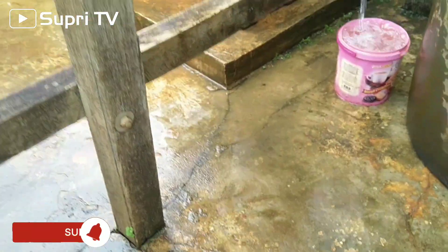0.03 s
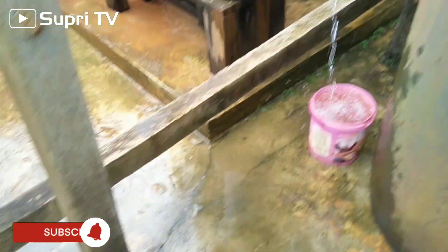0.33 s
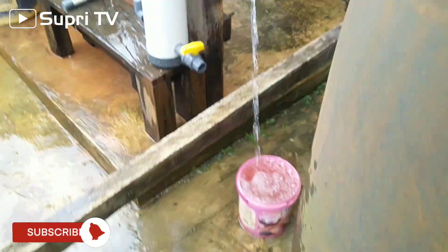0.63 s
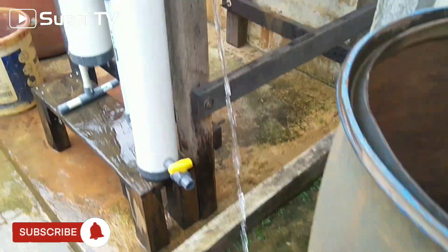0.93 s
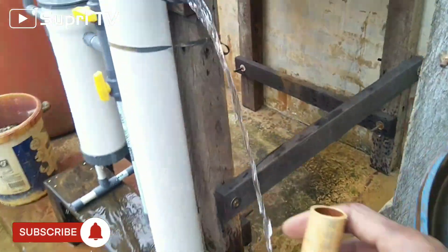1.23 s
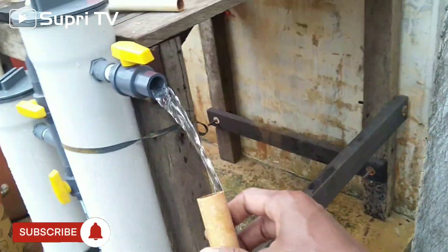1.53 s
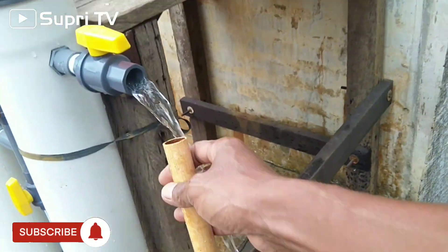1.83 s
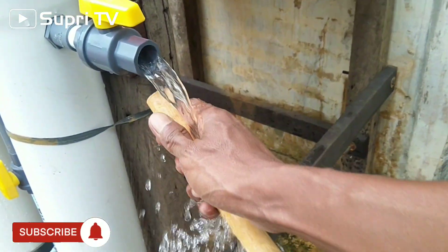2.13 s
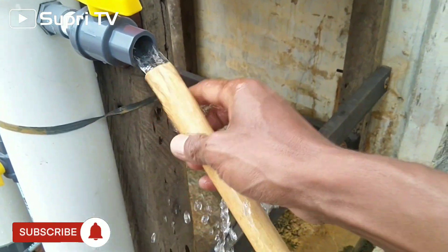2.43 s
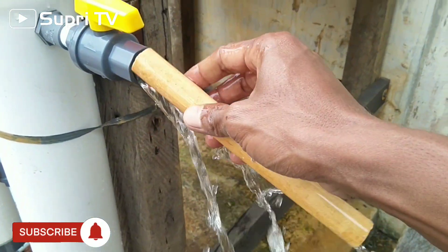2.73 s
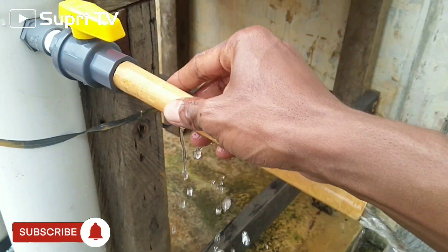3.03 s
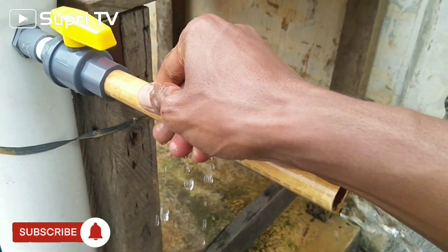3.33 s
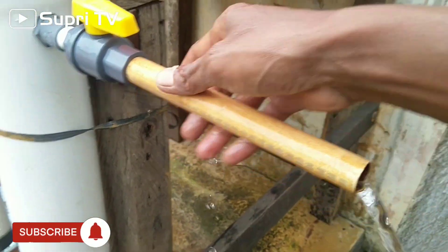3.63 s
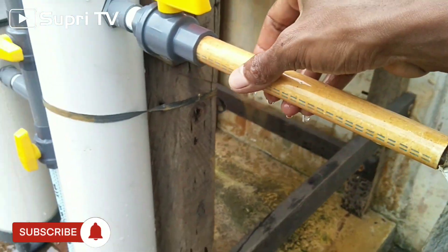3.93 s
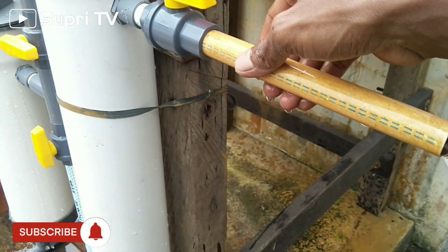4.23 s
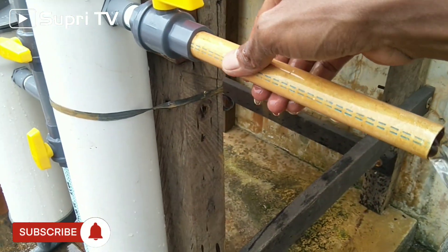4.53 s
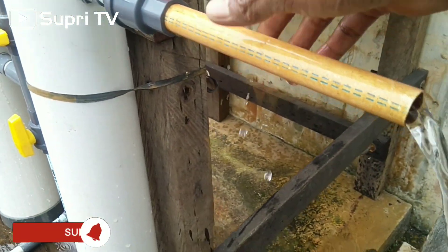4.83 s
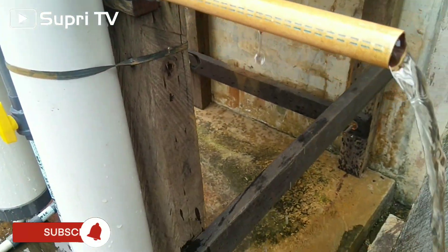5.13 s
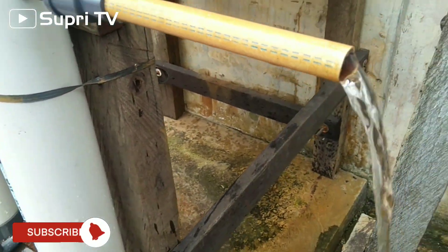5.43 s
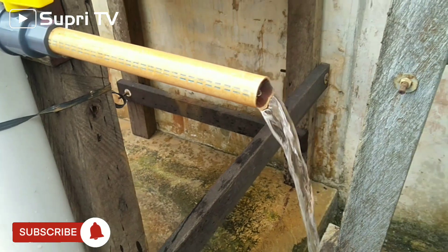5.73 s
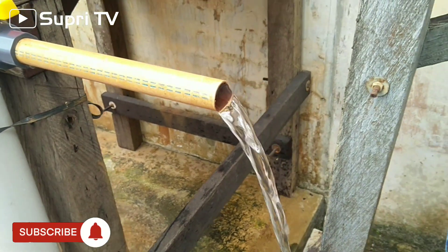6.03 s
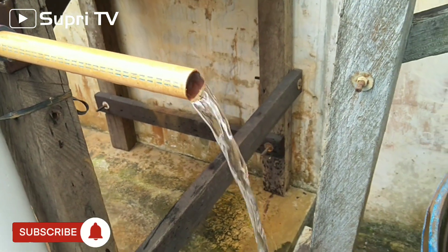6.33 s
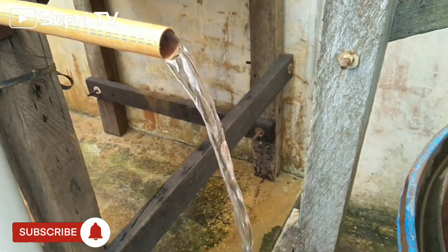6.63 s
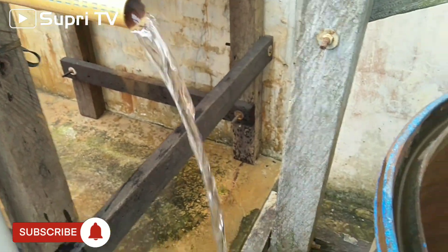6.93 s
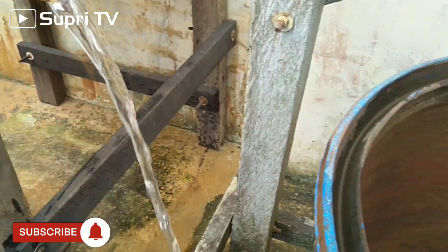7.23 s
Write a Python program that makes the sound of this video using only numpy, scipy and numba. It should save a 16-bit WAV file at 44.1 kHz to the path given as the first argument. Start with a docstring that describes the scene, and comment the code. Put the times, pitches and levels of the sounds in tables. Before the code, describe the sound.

In a walled corner outdoors, a nearby stream of water splashes and gurgles into a full bucket while air briefly buffets the microphone. The stream gives way to short hissing squirts, scattered spatter and ringing drips as a bamboo tube is fitted to the outlet. Water churns faintly inside the tube, then pours out and splashes unevenly onto wet concrete. A low rumble and short echoes continue throughout.

```python
"""First, water runs from an open valve into a small full bucket in a walled corner of a yard.
It lands in lumps that slap, and the air they trap rings as plops and glugs.
At about 2.3 s a bamboo tube is pushed into the valve: water hisses through the gap,
the jet breaks up and drips smack on the wet concrete. From about 5.7 s the stream leaves
the tube and splashes on the ground. A low rumble and short echoes last throughout."""
import sys
import numpy as np
from scipy import signal
from scipy.fft import rfft, irfft
from scipy.io import wavfile
from scipy.ndimage import uniform_filter1d
from numba import njit

SR = 44100
rng = np.random.default_rng(int(sys.argv[2]) if len(sys.argv) > 2 else 0)


def store_wav(level_fs):
    """Save 16-bit WAV to argv[1]."""
    pcm = np.round(np.clip(np.atleast_2d(level_fs), -1, 1) * 32767)
    wavfile.write(sys.argv[1], SR, pcm.T.astype(np.int16))


N = 325458
TIME = np.arange(N) / SR

# The low rumble of the surroundings. Each row: time in seconds, level in dB.
RUMBLE_LEVELS = [(0.0, -45), (0.4, -36.5), (1.1, -43.5), (2.2, -36.5), (2.6, -43.5), (3.9, -38),
                 (5.15, -39), (5.6, -41.5), (6.6, -41.5), (6.9, -49.5), (7.38, -50)]
# Water churning in valve and tube, louder once the tube runs full. Each row: time in seconds, level in dB.
CHURN_LEVELS = [(2.2, -51), (3.0, -50), (3.8, -46), (5.2, -42), (5.8, -45.5)]
# The stream into the bucket, and later onto the ground. Each row: time in seconds, level in dB.
BUCKET_FLOW = [(0.0, -27), (0.3, -30), (1.1, -29), (1.7, -28), (2.16, -30), (2.245, -28.5), (2.3, -36),
               (2.45, -55)]
GROUND_FLOW = [(5.62, -66), (5.75, -32.5), (6.6, -34.5), (7.38, -33)]

# The tone colour of each source, from bass to treble. Each row: frequency in Hz, level in dB.
RUMBLE_COLOUR = [(20, -27), (35, -11), (47, -1.5), (60, -2), (76, -0.5), (97, 1.5), (115, -14), (135, 0),
                 (200, -12.5), (400, -28.5)]
CHURN_COLOUR = [(110, -5), (160, -1.5), (220, -6), (330, 0.5), (500, -2), (750, -5.5), (1200, -18),
                (3000, -26)]
SPRAY_COLOUR = [(1500, -25.5), (3000, -21), (4500, -3), (5500, 2.5), (6500, 5.5), (7400, 3.5), (8200, -0.5)]
PATTER_COLOUR = [(600, -5), (1200, -8), (2000, -5.5), (2900, -1.5), (4200, -2.5), (5500, -6), (8000, -28)]
BUCKET_COLOUR = [(120, -23.5), (200, -3), (333, -2), (589, -8), (778, -4), (1200, -9.5), (2800, -9.5),
                 (5440, -15), (7070, -13), (8000, -21.5), (10400, -42), (17600, -120)]
GROUND_COLOUR = [(76, -32.5), (150, -3.5), (278, -3.5), (399, -8), (507, -6), (1060, -3), (1360, -10),
                 (1880, -9.5), (4010, -9), (5200, -14), (7090, -8.5), (8000, -17), (10400, -66),
                 (17600, -120)]
# The notes at which the corner's hollows and the bucket ring.
# Each row: pitch in Hz, width in Hz, level in dB.
HOLLOW_RINGS = [(275, 30, -6), (526, 26, -9.5), (1085, 35, -7.5), (1810, 130, -9.5)]
BUCKET_RINGS = [(1540, 290, -8.5), (2750, 110, -11)]

# A hum swelling out of the rumble. Each row: start in seconds, length in seconds, level in dB.
HUM_SWELLS = [(4.3, 0.5, -40), (4.96, 0.24, -40)]
# Air buffeting the swinging microphone. One row: start in seconds, length in seconds, level in dB.
AIR_BUFFET = (0.665, 0.084, -35.5)
# Soft bumps on the microphone. Each row: start in seconds, level in dB, pitch in Hz.
BUMPS = [(0.675, -21, 101), (0.712, -14.5, 122), (0.726, -18.5, 230)]
# Water squeezed through a narrow gap.
# Each row: start and end in seconds, first and last pitch in Hz, level in dB.
SQUIRTS = [(2.27, 2.44, 3950, 4100, -49), (2.96, 3.03, 3100, 3400, -43), (3.025, 3.075, 3600, 4200, -42),
           (3.055, 3.18, 4450, 4700, -38.5), (3.50, 3.63, 4600, 5200, -53)]
# Stray water landing on the concrete.
# Each row: start and length in seconds, level of fine spray in dB, level of coarse patter in dB.
SHOWERS = [(2.46, 0.1, -39.5, -40), (2.621, 0.11, -47, -44), (2.727, 0.18, -42, -45),
           (2.924, 0.3, -40.5, -44), (3.169, 0.15, -39, -39), (3.351, 0.11, -41, -44.5),
           (3.713, 0.15, -51.5, -59), (4.118, 0.12, -41, -44), (4.374, 0.077, -38.5, -44),
           (4.273, 0.95, -51.5, -65), (4.632, 0.13, -41, -45.5), (4.907, 0.11, -42.5, -52),
           (4.992, 0.25, -36.5, -40.5), (5.074, 0.07, -50, -39), (5.27, 0.48, -41.5, -48)]
# Trapped air bubbles; the big, low ones glug. Each row: start in seconds, level in dB, pitch in Hz.
BUBBLES = [(1.247, -27, 297), (1.334, -29, 276), (1.492, -26.5, 327), (1.505, -26, 466), (1.545, -28, 562),
           (1.618, -26, 272), (1.655, -34, 430), (1.834, -27, 320), (1.982, -28, 329), (2.049, -26, 285),
           (2.157, -21.5, 314), (2.688, -29, 3400), (3.553, -33.5, 3020), (3.683, -31, 3120),
           (5.995, -27, 3900), (6.04, -24, 2500), (6.142, -26.5, 1970), (6.232, -24, 4000),
           (6.272, -29, 3570), (7.076, -30, 262)]
# Air pockets closing with a round plop. Each row: start in seconds, level in dB, pitch in Hz.
PLOPS = [(0.088, -21, 1170), (0.274, -16, 1550), (0.423, -21, 1420), (0.54, -20, 1420), (0.597, -19, 1360),
         (1.067, -20.5, 760), (1.246, -17.5, 1670), (1.416, -19, 1330), (1.769, -15.5, 1380),
         (1.8035, -13, 1270), (1.839, -22, 980), (1.871, -28, 1190), (1.894, -19, 1600),
         (1.908, -19.5, 1770), (1.9574, -12.5, 1390), (1.968, -24, 1650), (1.994, -38, 910),
         (2.05, -25, 880), (2.0825, -19.5, 1530), (2.112, -25, 1480), (2.139, -28, 910), (2.185, -20, 1520),
         (2.213, -21, 1570), (2.234, -27, 1480), (2.322, -25, 924), (2.52, -25.5, 1500), (2.549, -27, 1650),
         (2.664, -26, 1380), (3.122, -28.5, 1240), (3.166, -8, 1790), (3.196, -16, 1470),
         (3.29, -25.5, 840), (3.3156, -19.5, 1520), (3.494, -26.5, 1760), (3.6452, -28, 1350),
         (3.672, -32, 1300), (5.7563, -14.5, 2010), (5.768, -21, 500), (5.803, -20, 1980),
         (5.821, -20, 947), (5.837, -17, 1950), (6.037, -24.5, 1880), (6.071, -17, 910), (6.129, -28, 1070),
         (6.456, -11.5, 998), (6.547, -21, 1050), (6.65, -26, 1260), (6.681, -23, 1870), (6.82, -24.5, 970),
         (6.833, -21, 1860), (6.936, -23, 1510), (7.157, -24, 980), (7.18, -23, 2050), (7.222, -24.5, 690),
         (7.296, -21.5, 1030)]
# Small lumps of water hitting flat. Each row: start in seconds, level in dB, middle frequency in Hz.
SPATS = [(0.112, -17, 4000), (0.3636, -22.5, 2850), (0.672, -20.5, 3280), (0.724, -19, 2200),
         (0.926, -25.5, 2300), (0.856, -20.5, 3150), (1.247, -24.5, 1900), (1.269, -33, 2600),
         (1.291, -24, 2770), (1.605, -19, 2400), (1.834, -21, 3360), (1.905, -34, 2600),
         (2.046, -22.5, 3100), (5.787, -19, 3150), (5.981, -23.5, 3470), (6.114, -22, 2940),
         (6.18, -25, 2930), (6.25, -22, 2100), (6.507, -22.5, 3500), (6.568, -22.5, 3800),
         (6.7087, -23.5, 2960), (6.8548, -23.5, 2700), (6.916, -24, 3700), (6.983, -18, 3300),
         (7.046, -24, 3010), (7.06, -21, 3720), (7.1237, -26, 2690), (7.1579, -21, 4450),
         (7.281, -23.5, 4110), (7.3144, -19, 3820)]
# Single drops on hard, wet surfaces. Each row: start in seconds, level in dB, pitch in Hz.
HARD_DROPS = [(0.144, -30, 7100), (0.2165, -27.5, 7300), (1.1865, -18, 4600), (1.2148, -29, 7100),
              (2.611, -20.5, 6300), (2.661, -20.5, 3560), (2.73, -22.5, 6050), (2.771, -24.5, 2530),
              (2.7948, -25, 6050), (2.829, -16.5, 6900), (2.957, -21, 3680), (2.9836, -16, 4000),
              (2.9865, -16, 3170), (3.095, -22.5, 4300), (3.1817, -15, 6440), (3.251, -19.5, 4770),
              (3.36, -25, 3700), (3.468, -30.5, 6940), (3.719, -21.5, 5040), (3.845, -25.5, 5040),
              (4.126, -24.5, 6670), (4.143, -23, 6500), (4.169, -23, 6400), (4.245, -31, 7000),
              (4.338, -24.5, 6560), (4.44, -28, 4700), (4.676, -30, 5000), (4.769, -27, 5940),
              (4.884, -30.5, 6670), (5.003, -22.5, 4470), (5.016, -22.5, 1840), (5.225, -24, 3900),
              (5.474, -21, 3140), (5.558, -28.5, 6600), (5.68, -24, 4170), (6.473, -17.5, 3200)]
# Heavy drips into standing water. Each row: start in seconds, level in dB, cavity pitch in Hz,
# ring length in cycles, pitch of a second bubble in Hz, its level in dB compared with the first.
PUDDLE_DRIPS = [(0.455, -18.5, 2725, 60, 2100, -16), (1.1857, -15, 2870, 47, 3160, -9),
                (3.026, -8.5, 3270, 27, 3880, -2.5), (3.2072, -10, 2950, 27, 4050, -2),
                (3.9405, -9.5, 3270, 18, 2336, -1.5), (4.2088, -9.5, 2820, 17, 2470, -2.5),
                (5.084, -18.5, 2670, 64, 2520, -4)]
# Large lumps of water slapping down.
# Each row: start in seconds, level in dB, cavity pitch in Hz, extra treble in dB.
SLAPS = [(0.027, -19.5, 853, 4), (0.1155, -2, 1550, -29), (0.168, -7, 575, -23), (0.172, -5, 1570, -29),
         (0.32, -14.5, 1250, -12), (0.656, -16, 1290, -8), (0.805, -20, 2020, -7.5), (1.483, -13, 880, -24),
         (1.497, -20, 654, -23), (1.513, -16, 790, -23), (1.529, -23, 556, -17), (1.6834, -15.5, 810, -2.5),
         (1.699, -23.5, 900, 1), (1.763, -20, 795, -0.5), (1.853, -17.5, 900, -5), (2.125, -16.5, 1520, -6),
         (3.163, -17, 1310, 2), (3.195, -20, 1640, -7), (3.208, -14, 1410, 4.5), (5.742, -23.5, 654, -11),
         (5.7569, -12.5, 910, -7), (6.071, -25.5, 950, 0), (6.457, -20.5, 1030, -8),
         (6.74, -21.5, 1070, -4)]


def undb(db):
    """Turn decibels into a gain to multiply by."""
    return 10 ** (np.asarray(db) / 20)


def curve(rows):
    """A gain that follows rows of seconds and dB, and fades quickly outside them."""
    times, db = np.transpose(rows)
    outside_s = np.abs(TIME - np.clip(TIME, times[0], times[-1]))
    return undb(np.interp(TIME, times, db) - 300 * outside_s)


def swells(rows, attack_s, release_s):
    """A gain that rises, holds and dies away for each row; where rows overlap, their powers add."""
    power = np.zeros(N)
    for start_s, length_s, db in rows:
        age = TIME[TIME > start_s] - start_s
        rise = np.minimum(age / attack_s, 1)
        fall = np.exp(-np.maximum(age - length_s, 0) / release_s)
        power[N - len(age):] += (undb(db) * rise * fall) ** 2
    return np.sqrt(power)


def surges(rate, db):
    """A gain for uneven gushes: it slides to a new random level `rate` times a second."""
    levels = np.clip(rng.standard_normal(int(rate * N / SR) + 2), -2, 1.5)
    return undb(db * np.interp(TIME * rate, np.arange(len(levels)), levels))


def steady(x):
    """Hold the average power at 1, keeping the quick flickers."""
    return x / np.sqrt(np.abs(uniform_filter1d(x ** 2, size=6000)) + 1e-18)


def colour(x, points):
    """Shape bass and treble along rows of Hz and dB."""
    hz, db = np.transpose(points)
    grid_hz = np.maximum(np.fft.rfftfreq(8192, 1 / SR), 1)
    bass_cut_db = 24 * np.minimum(np.log2(grid_hz / hz[0]), 0)
    gains = undb(np.interp(np.log(grid_hz), np.log(hz), db) + bass_cut_db)
    # folding the cepstrum keeps the filter from ringing before a hit
    cepstrum = irfft(np.log(gains))
    half = len(cepstrum) // 2
    cepstrum[1:half] *= 2
    cepstrum[half + 1:] = 0
    return signal.fftconvolve(x, irfft(np.exp(rfft(cepstrum))))[:len(x)]


def band(x, lo_hz, hi_hz):
    """Gently turn down everything outside two frequencies."""
    edges_hz = [lo_hz, min(hi_hz, SR / 2 - 1)]
    return signal.sosfilt(signal.butter(2, edges_hz, "band", fs=SR, output="sos"), x)


@njit
def grains(times, pitches, cycles, sizes, glide):
    """Short notes that fade 50 dB over their cycles; a glide of 0.1 lifts the pitch by a tenth."""
    out = np.zeros(N)
    for k in range(len(times)):
        start = int(times[k] * SR)
        length = int(cycles[k] * SR / pitches[k]) + 2
        phase = 0.
        for i in range(max(0, min(length, N - start))):
            phase += 2 * np.pi * pitches[k] * (1 + glide * i / length) / SR
            out[start + i] += sizes[k] * np.exp(-5.76 * i / length) * np.sin(phase)
    return out


def bursts(times, db, decay_s, lo_hz, hi_hz):
    """Sharp puffs of noise, each at its own level."""
    t = TIME[:SR // 10]
    out = np.zeros(N + len(t))
    for start_s, gain in zip(times, undb(db)):
        puff = band(rng.standard_normal(len(t)) * np.exp(-t / decay_s), lo_hz, hi_hz)
        out[int(start_s * SR):][:len(t)] += gain * puff * np.sqrt(decay_s * SR / 2 / np.sum(puff ** 2))
    return out[:N]


def resonate(x, rings):
    """The soft ringing that a sound stirs up in a hollow space."""
    return sum(undb(db) * signal.lfilter(*signal.iirpeak(hz, hz / width, fs=SR), x)
               for hz, width, db in rings)


def yard(x, first_echo_s=0.0014, fade_s=0.21, shifts=16):
    """Grainy echoes from the close wall, tanks and floor; they shift as the microphone moves."""
    t, out = TIME[:SR // 3], np.zeros(N + SR)
    for k in range(shifts + 1):
        # each overlapping piece gets its own echo pattern
        piece = x * np.cos(np.pi / 2 * np.clip(np.arange(N) * shifts / N - k, -1, 1))
        start, end = max((k - 1) * N // shifts, 0), (k + 1) * N // shifts
        echoes = rng.standard_normal(len(t)) ** 3 * undb(-60 * t / fade_s) * (t > first_echo_s)
        echoed = signal.fftconvolve(piece[start:end], echoes / np.sqrt(np.sum(echoes ** 2)))
        out[start:start + len(echoed)] += echoed
    return out[:N]


def rumble():
    """The surroundings give a wavering rumble, which swells once as air buffets the microphone."""
    wavering = curve(RUMBLE_LEVELS) * surges(rate=9.5, db=-1.1)
    buffet = swells([AIR_BUFFET], attack_s=0.083, release_s=0.14)
    return steady(colour(rng.standard_normal(N), RUMBLE_COLOUR)) * (wavering + buffet)


def hum(hz=76.3):
    """A low, pure drone that comes and goes."""
    tone = np.sqrt(2) * np.sin(2 * np.pi * hz * TIME)
    return tone * swells(HUM_SWELLS, attack_s=0.05, release_s=0.034)


def bumps(cycles=9.):
    """Soft knocks on the microphone make low thuds that sag a little in pitch."""
    times, db, hz = np.transpose(BUMPS)
    thuds = grains(times, hz, np.full(len(times), cycles), undb(db), glide=-0.023)
    return band(thuds, 95, 600)


def churn():
    """Water tumbles through valve and tube with a low, uneven rush."""
    rush = steady(colour(rng.standard_normal(N), CHURN_COLOUR))
    return rush * curve(CHURN_LEVELS) * surges(rate=20, db=2.0)


def slosh(gain_db=-25, hold_s=0.012):
    """The puddle churns on briefly after each large slap."""
    rows = [(start_s, hold_s, db + gain_db) for start_s, db, _, _ in SLAPS]
    rush = steady(colour(rng.standard_normal(N), CHURN_COLOUR))
    return rush * swells(rows, attack_s=0.0017, release_s=0.075)


def squirts(half_width_hz=340):
    """A sputtering hiss rises in pitch as the gap between tube and valve closes."""
    out = np.zeros(N)
    for start_s, end_s, start_hz, end_hz, db in SQUIRTS:
        progress = np.clip((TIME - start_s) / (end_s - start_s), 0, 1)
        phase = 2 * np.pi * np.cumsum(start_hz + (end_hz - start_hz) * progress) / SR
        # low noise times a tone gives a hiss around that tone
        hiss = steady(band(rng.standard_normal(N), 22, half_width_hz) * np.sin(phase))
        out += hiss * np.sqrt(np.abs(np.sin(np.pi * progress))) * undb(db)
    return out * surges(rate=48, db=2.5)


def fizz(rate=110, cycles=130.):
    """Tiny bubbles ring in the wet film, each a short rising note."""
    when, note, size = rng.random((int(rate * N / SR), 3)).T
    hz = 3500 + 4300 * note
    return steady(grains(when * N / SR, hz, np.full(len(when), cycles), undb(12 * size), glide=.06))


def droplets(points, rate, scatter_db, mist_db):
    """Small drops tick on the concrete in a hiss of mist, a few much larger than the rest."""
    when, note, ring, size = rng.random((int(rate * N / SR), 4)).T
    hz = 900 + 7300 * note
    cycles = 5 * 10 ** ring
    gains = undb(-scatter_db * np.log(np.maximum(size, .02))) * np.sqrt(hz / cycles)
    ticks = steady(colour(grains(when * N / SR, hz, cycles, gains, glide=.05), points))
    mist = steady(colour(rng.standard_normal(N), points))
    return steady(ticks + undb(mist_db) * mist)


def spray(fizz_db=-7, leak_db=-57.5):
    """The broken jet comes down in showers of fine, fizzing spray and coarser patter."""
    fine = droplets(SPRAY_COLOUR, rate=1100, scatter_db=4.0, mist_db=-2) + undb(fizz_db) * fizz()
    coarse = droplets(PATTER_COLOUR, rate=760, scatter_db=6.0, mist_db=0.5)
    times, lengths, fine_db, coarse_db = np.transpose(SHOWERS)
    fine_gain, coarse_gain = (swells(zip(times, lengths, db), attack_s=0.0063, release_s=0.022)
                              for db in (fine_db, coarse_db))
    leak = curve([(2.46, leak_db), (5.8, leak_db)])  # the loose joint dribbles between showers
    return (fine * fine_gain + coarse * np.hypot(coarse_gain, leak)) * surges(rate=70, db=2.5)


def bubbles(gain_db=2, cycles_at_1khz=38):
    """Trapped air rings and rises in pitch as it nears the surface; small bubbles last more cycles."""
    times, db, hz = np.transpose(BUBBLES)
    cycles = cycles_at_1khz * np.cbrt(hz / 1000)
    return grains(times, hz, cycles, undb(db + gain_db), glide=0.15)


def plops(gain_db=4, froth_db=-12, cycles_at_1khz=17.7, rise_share=0.29, glide=0.088):
    """An air pocket swells into a short note as it closes, with a little froth around it."""
    times, db, hz = np.transpose(PLOPS)
    cycles = cycles_at_1khz * np.sqrt(hz / 1000)
    gains = undb(db + gain_db)
    note = grains(times, hz, cycles, gains, glide)
    onset = grains(times, hz, cycles * rise_share, gains, glide * rise_share)
    froth = bursts(times, db + froth_db, decay_s=0.0056, lo_hz=710, hi_hz=2620)
    return note - onset + froth  # taking away a shorter note softens the start


def spats(rise_s=0.0015, decay_s=0.0046):
    """A small lump flattens on the wet film in a soft puff of noise, one octave wide."""
    t, out = TIME[:SR // 10], np.zeros(N + SR)
    shape = (1 - np.exp(-t / rise_s)) * np.exp(-t / decay_s)
    for start_s, db, hz in SPATS:
        noise = band(rng.standard_normal(len(t)), hz / np.sqrt(2), hz * np.sqrt(2))
        out[int(start_s * SR):][:len(t)] += undb(db) * shape * noise / np.std(noise)
    return out[:N]


def hard_drops(snap_db=6, crack_db=-4, smack_db=-11, scatter_db=-7):
    """A drop snaps and cracks on the wet film, smacks flat, rings briefly and scatters droplets."""
    times, db, hz = np.transpose(HARD_DROPS)
    treble_db = 11 * np.log2(hz / 4650)  # smaller, higher drops scatter more treble
    snap = grains(times, hz, np.full(len(times), 3.), undb(db + snap_db), glide=0.)
    crack = bursts(times, db + crack_db, decay_s=.0012, lo_hz=2800, hi_hz=8000)
    smack_levels = db + smack_db - np.maximum(treble_db, 0)
    smack = bursts(times, smack_levels, decay_s=0.0047, lo_hz=1810, hi_hz=4280)
    ring = grains(times, hz, np.full(len(times), 22.), undb(db), glide=.1)
    scatter = bursts(times, db + treble_db + scatter_db, decay_s=.005, lo_hz=4500, hi_hz=8000)
    return band(snap + crack + smack + ring + scatter, 1300, 12000)  # so small a drop makes no bass


def puddle_drips(tick_db=-7, splash_db=-16.5, linger_db=-23, linger_cycles=380.):
    """A heavy drip ticks, rings its cavity and a second bubble, and splashes; both notes linger."""
    times, db, hz, cycles, second_hz, second_db = np.transpose(PUDDLE_DRIPS)
    ring = grains(times, hz, cycles, undb(db), glide=.04)
    second = grains(times, second_hz, cycles, undb(db + second_db), glide=.06)
    long_cycles = np.full(len(times), linger_cycles)
    linger = sum(grains(times, pitch, long_cycles, undb(level + linger_db), glide=.02)
                 for pitch, level in ((hz, db), (second_hz, db + second_db)))
    tick = bursts(times, db + tick_db, decay_s=0.0021, lo_hz=1660, hi_hz=7700)
    splash = bursts(times, db + splash_db, decay_s=0.016, lo_hz=2600, hi_hz=3900)
    return band(ring + second + linger + tick + splash, 1300, 12000)


def slaps(thud_db=-6.5, pocket_db=-11, splash_db=-7):
    """A lump of water thuds, opens a cavity over a deeper air pocket and throws off a bright splash."""
    times, db, hz, treble_db = np.transpose(SLAPS)
    thud = bursts(times, db + thud_db, decay_s=0.005, lo_hz=248, hi_hz=2110)
    cavity = grains(times, hz, np.full(len(times), 7.), undb(db), glide=.15)
    pocket = grains(times, 9 * np.sqrt(hz), np.full(len(times), 8.), undb(db + pocket_db), glide=.15)
    splash = bursts(times, db + treble_db + splash_db, decay_s=.008, lo_hz=2200, hi_hz=7000)
    return thud + cavity + band(pocket, 180, 2000) + splash


def plinks(rate=130):
    """Lone small bubbles give clear rising notes, the high ones ringing for more cycles."""
    when, note, size = rng.random((int(rate * N / SR), 3)).T
    hz = 600 * 13 ** note
    cycles = 30 * (hz / 2000) ** .8
    gains = undb(-3.5 * np.log(np.maximum(size, .06))) * hz ** .75 / np.sqrt(cycles)
    return grains(when * N / SR, hz, cycles, gains, glide=.07)


def stream(points, lumps_per_s, foam_db, plink_db, ring_cycles=15, froth_hz=5000, froth_decay_s=0.0036):
    """The jet breaks into lumps; each lands as nine pops and a puff of froth, among ringing bubbles."""
    count = int(lumps_per_s * N / SR)
    when, note, ring, size = rng.random((count, 4, 9)).transpose(1, 0, 2)
    landing_s = (np.arange(count) + 2 * rng.random(count)) / lumps_per_s
    weight = undb(3.5 * np.clip(rng.standard_normal(count), -2, 1.5))
    times = landing_s[:, None] - .004 * np.log(when)
    hz = 200 * 40 ** (note ** .8)
    # small bubbles lose less per cycle than large ones
    cycles = ring_cycles * 2 ** (2 * ring - 1) * np.sqrt(hz / 1000)
    gains = weight[:, None] * undb(12 * size) * hz / np.sqrt(cycles)
    pops = grains(times.ravel(), hz.ravel(), cycles.ravel(), gains.ravel(), glide=.08)
    splats = steady(colour(pops, points))
    foam = steady(colour(rng.standard_normal(N), points))
    notes = steady(colour(plinks(), points))
    # the treble is froth, too fine to have a pitch
    impacts = np.bincount((landing_s * SR).astype(int), weight ** 3, N)[:N]
    puffs = np.sqrt(signal.lfilter([1], [1, -np.exp(-1 / (froth_decay_s * SR))], impacts))
    froth = steady(colour(rng.standard_normal(N) * puffs, points))
    low, high = (signal.butter(3, froth_hz, kind, fs=SR, output="sos") for kind in ("low", "high"))
    lumps = signal.sosfilt(low, splats + undb(plink_db) * notes) + signal.sosfilt(high, froth)
    return steady((lumps + undb(foam_db) * foam) * surges(rate=45, db=1.6))


def scene(echo_db=-6.5):
    """All the water in its corner; only the treble of the echoes spreads left and right."""
    bucket = stream(BUCKET_COLOUR, lumps_per_s=130, foam_db=-6, plink_db=-7)
    ground = stream(GROUND_COLOUR, lumps_per_s=115, foam_db=-3, plink_db=-5.5)
    into_bucket = undb(-4.5) * (bucket + resonate(bucket, BUCKET_RINGS)) * curve(BUCKET_FLOW)
    onto_ground = undb(-1) * ground * curve(GROUND_FLOW)
    pour = into_bucket + onto_ground + slaps() + slosh()
    water = pour + resonate(pour, HOLLOW_RINGS) + bubbles() + plops() + spats()
    water += spray() + hard_drops() + puddle_drips() + squirts()
    middle = water + undb(echo_db) * yard(water) + churn() + rumble() + bumps() + hum()
    side = colour(yard(water), [(3200, -70), (4500, -13), (6000, -8), (7500, -22)])
    return np.array([middle + side, middle - side])


def record(dry, ceiling=.85, bottom_hz=35, top_hz=7900):
    """Round off the loudest peaks, drop the deepest bass and cut the top steeply."""
    sound = ceiling * np.tanh(dry / ceiling)
    sound = signal.sosfilt(signal.butter(3, bottom_hz, "high", fs=SR, output="sos"), sound)
    return signal.sosfilt(signal.cheby1(14, .3, top_hz, fs=SR, output="sos"), sound)


dry = scene()
out = record(dry)
store_wav(out)
```